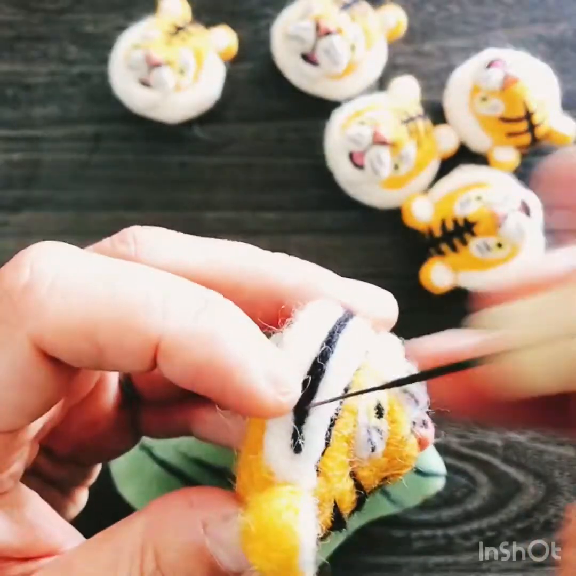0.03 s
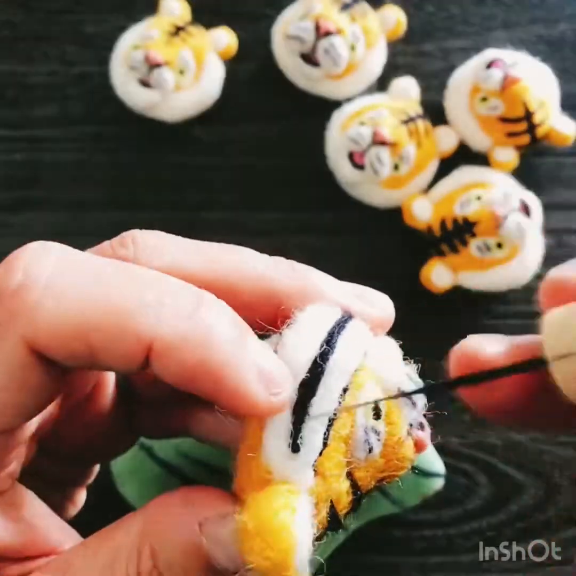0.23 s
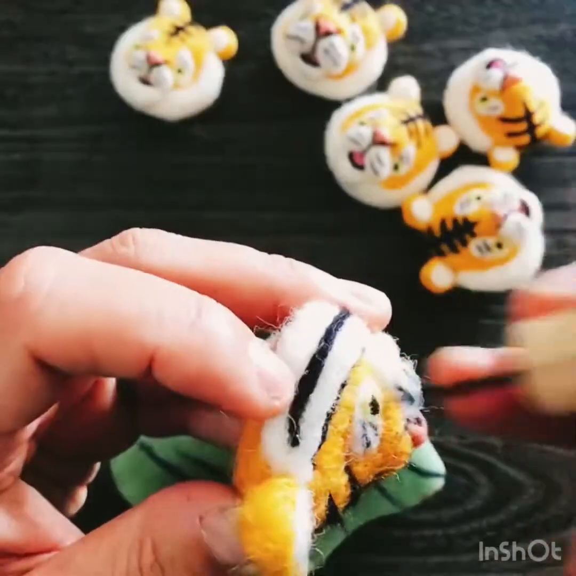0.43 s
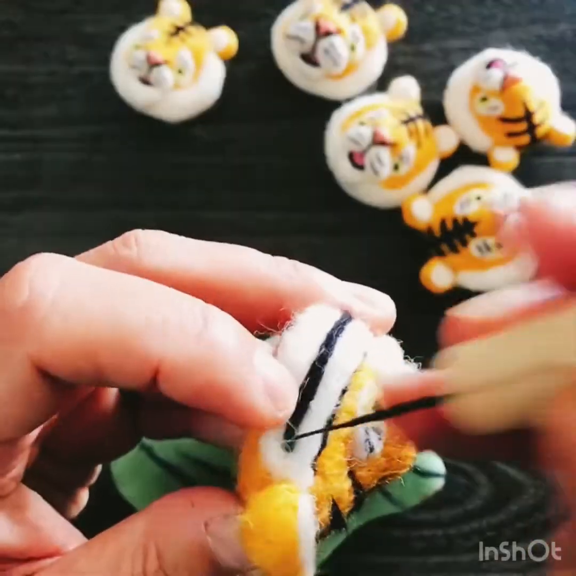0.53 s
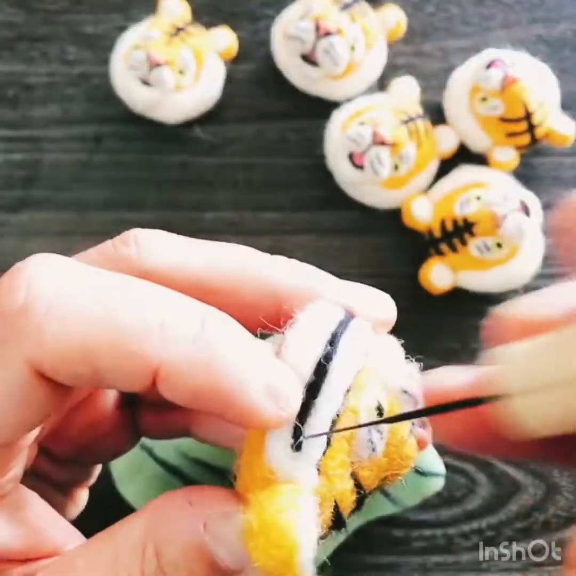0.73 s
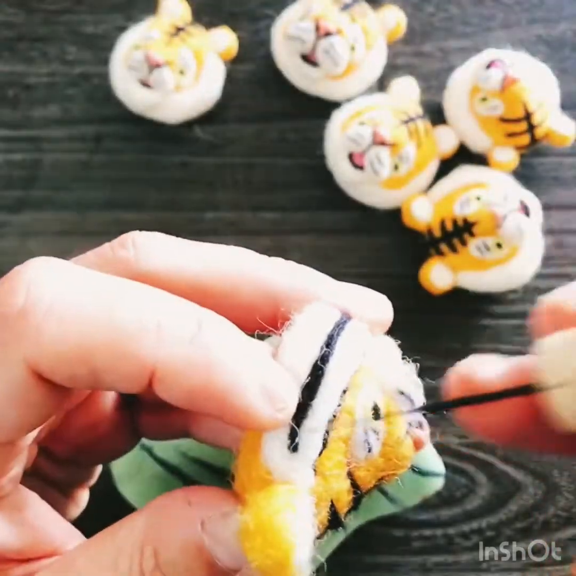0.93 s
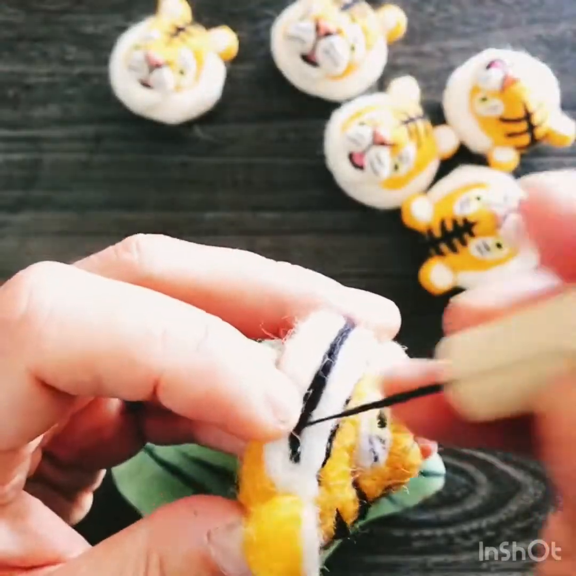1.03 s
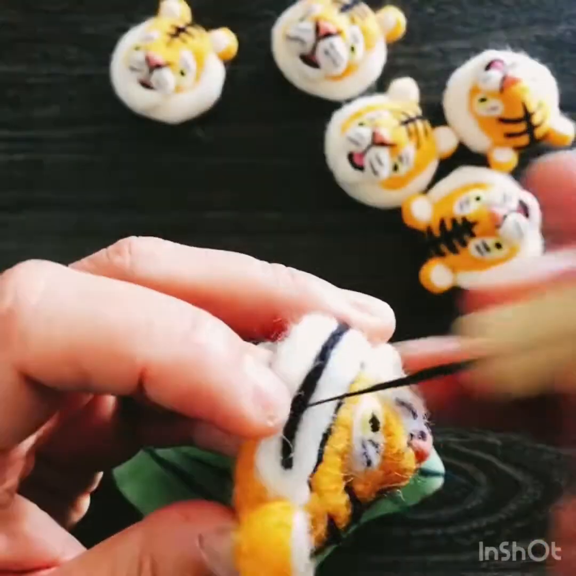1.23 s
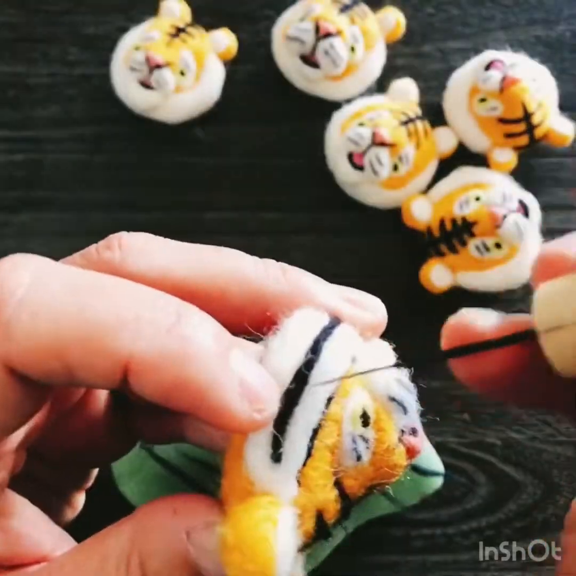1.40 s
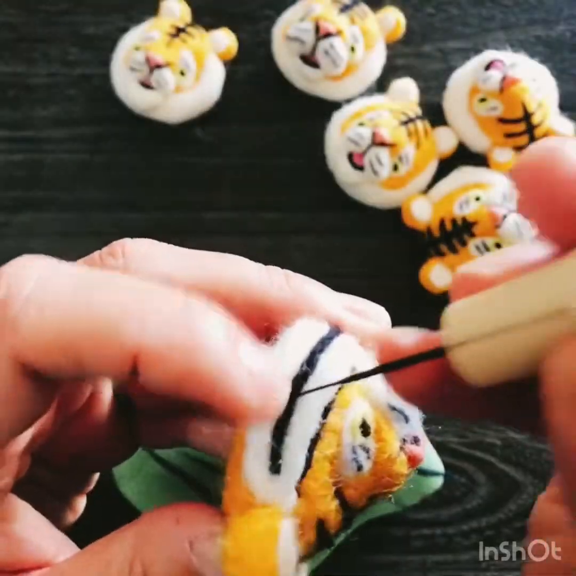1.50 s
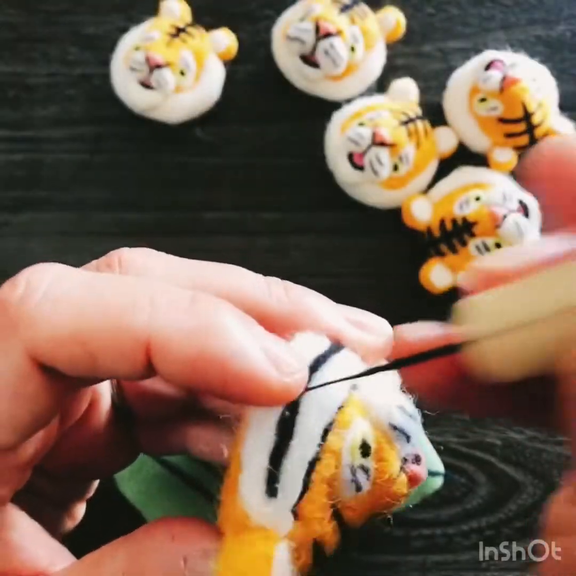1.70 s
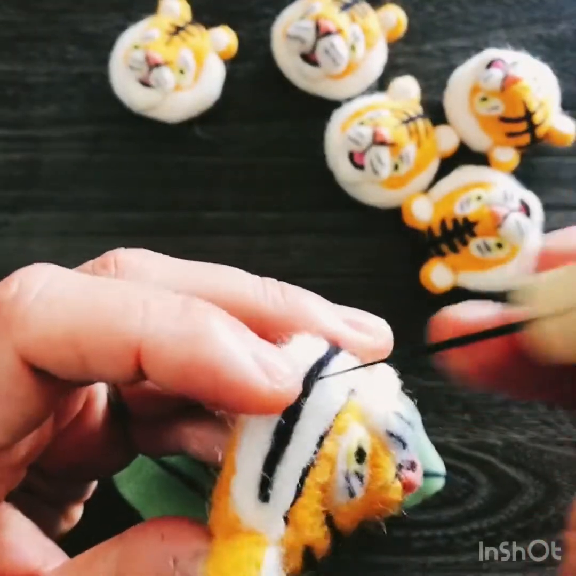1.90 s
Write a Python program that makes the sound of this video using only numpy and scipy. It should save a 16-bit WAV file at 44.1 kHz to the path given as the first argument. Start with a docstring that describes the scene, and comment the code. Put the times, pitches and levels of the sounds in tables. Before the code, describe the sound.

A felting needle stabs wool eight times, making soft, short, scratchy crunches.

```python
"""A barbed felting needle is pushed eight times into a small hand-held wool figure, in a quiet room.
Each stab drags thousands of fibres over the barbs. Their stick-slip friction is a random train of
impulses, heard as a dense crunch with narrow resonances and a finer fizz. One fibre snaps, the packed
wool yields in dull puffs, and fingers rub and tick on the figure. Reflections from the hands, table
and room follow briefly, over a low hum, rumble and hiss."""
import sys
import numpy as np
from scipy import signal
from scipy.io import wavfile

SR = 44100
rng = np.random.default_rng(int(sys.argv[2]) if len(sys.argv) > 2 else 0)


def to_wav(sig):
    """Store sig (one row per channel, or 1-D mono) as 16-bit WAV at the path in sys.argv[1].

    Samples outside -1..1 are clipped; the rate is SR.
    """
    pcm = np.clip(np.atleast_2d(sig), -1, 1) * 32767
    pcm = np.round(pcm).astype(np.int16)
    wavfile.write(sys.argv[1], SR, pcm.T)  # frames by channels


N = 85995

# Spectral envelopes of the crunch and the fizz: f/Hz, relative level/dB
CRUNCH_SPECTRUM = [(150, -31), (650, -31), (1100, -20), (1450, -12.5), (1800, -6.5), (3000, -2),
                   (3600, -0.5), (5000, 0), (6100, -2), (7000, -10.5), (8200, -19.5), (11000, -29.5),
                   (16000, -39)]
FIZZ_SPECTRUM = [(1000, -31), (4000, -6), (8000, 2), (9900, -1), (10500, -9.5), (11200, -1.5), (12400, -7),
                 (14200, -2), (15700, -5.5)]
# Their resonances, before the limits set in colour(): f/Hz, bandwidth/Hz, lift/dB
CRUNCH_RESONANCES = [(1705, 104, 5.5), (2016, 36, 4.5), (2219, 61, 4.5), (2560, 86, 0.5), (3520, 190, 5),
                     (3850, 33, -1.5), (4215, 120, 5), (4560, 39, 6.5), (4777, 30, -2.5), (5380, 31, 3),
                     (5550, 93, 5), (5770, 35, 3), (6170, 98, 5.5), (6700, 41, 5.5)]
LOW_RESONANCE = (935, 65, 5.5)
FIZZ_RESONANCES = [(7000, 32, 8.5), (9700, 130, 10), (10050, 180, 7.5)]
# Needle strokes: onset t/s, rise t/s, push t/s, level/dB, decay constant t/s, fizz offset/dB,
# emphasis f/Hz, emphasis lift/dB, squeak f/Hz, low-edge lift/dB
STABS = [(0.22, 0.063, 0.1, -42.5, 0.011, 2.5, 1750, -0.5, 3610, 5),
         (0.409, 0.066, 0.065, -40.5, 0.015, 0.5, 6800, 4, 5220, 0),
         (0.553, 0.047, 0.065, -41, 0.019, 2, 5350, 2.5, 4300, 3),
         (0.704, 0.054, 0.071, -43, 0.02, 1, 2820, 3.5, 4200, 5),
         (0.845, 0.048, 0.089, -42, 0.0084, -2, 4930, 2.5, 4080, 2.5),
         (1.034, 0.034, 0.072, -39.5, 0.012, 0.5, 6370, 7, 4740, -1),
         (1.218, 0.04, 0.089, -43, 0.016, -2.5, 5340, 0.5, 4900, -2.5),
         (1.402, 0.044, 0.14, -41.5, 0.021, -1.5, 3750, 2, 5450, 0.7)]
SLIPS_PER_S, SLIP_SPREAD_DB = 9000, 3
FIZZ_LAG_S, FIZZ_DB = 0.0075, -15

def stab(start, rise, length, db, decay, fizz_db, emphasis_hz, emphasis_db, squeak_hz, edge_db):
    """Stick-slip friction: barbs catch and release fibres, and each spot of wool has its own peaks."""
    push = stroke(start, rise, length, decay)
    late_push = stroke(start + FIZZ_LAG_S, rise, length - FIZZ_LAG_S, decay=0.023)
    # f/Hz, bandwidth/Hz, lift/dB
    local_peaks = [(emphasis_hz, 790, emphasis_db), (squeak_hz, 300, 4.5), (820, 1050, edge_db)]
    resonances = [LOW_RESONANCE] + CRUNCH_RESONANCES + local_peaks
    crunch = colour(push * slips(SLIPS_PER_S, SLIP_SPREAD_DB), CRUNCH_SPECTRUM, resonances)
    fizz = colour(late_push * slips(per_s=6000, spread_db=1.5), FIZZ_SPECTRUM, FIZZ_RESONANCES)
    return amp(db) * (crunch + amp(FIZZ_DB + fizz_db) * fizz)


def stroke(start, rise, length, decay, sag_db=-3):
    """Friction noise follows sliding speed, which builds, sags under resistance and dies away."""
    t = np.maximum(np.arange(N) / SR - start, 0)
    build = np.sin(np.pi / 2 * np.minimum(t / rise, 1)) ** 1.1
    sag = amp(sag_db * np.minimum(t / length, 1))
    return build * sag * np.exp(-np.maximum(t - length, 0) / decay)


def slips(per_s, spread_db):
    """Shot noise: fibres slip at independent random moments, in many small clicks and a few large."""
    size = amp(spread_db * np.minimum(rng.exponential(1, N), 4))
    polarity = rng.choice([-1, 1], N)
    slipping = rng.random(N) < per_s / SR
    return unit_rms(size * polarity * slipping)


def colour(x, spectrum, resonances=(), min_width_hz=45, max_lift_db=7, size=8192):
    """Source-filter principle: a unit-energy, minimum-phase filter sets a broad spectrum with peaks."""
    hz = abs(np.fft.fftfreq(size, 1 / SR))
    peaks_db = sum(min(lift, max_lift_db) / (1 + (2 * (hz - f) / max(width, min_width_hz)) ** 2)
                   for f, width, lift in resonances)
    log_gain = np.log(amp(curve_at(spectrum, hz) + peaks_db))
    transfer = np.exp(np.conj(signal.hilbert(log_gain)))
    return convolve(x, np.fft.ifft(transfer).real[:size // 2])


def fibre_break(start=1.2515, db=-35):
    """Impulse excitation: one fibre breaks in the seventh stab with a single bright click."""
    impulse = np.zeros(N)
    impulse[round(start * SR)] = 1
    return amp(db) * colour(impulse, FIZZ_SPECTRUM)


# Moments when the wool gives way: onset t/s, level/dB
PUFFS = [(0.281, -67.5), (0.516, -76), (0.754, -71), (1.228, -73)]
# Spectral envelope of a puff: f/Hz, relative level/dB
PUFF_SPECTRUM = [(150, -13), (400, -5), (600, 1), (850, -4), (2000, -19)]

def wool_puffs():
    """Yielding under load: packed wool gives way to the needle with a soft, low burst of noise."""
    push = sum(amp(db) * stroke(start, rise=0.019, length=0.027, decay=0.011) for start, db in PUFFS)
    return colour(push * slips(per_s=1700, spread_db=1), PUFF_SPECTRUM)


# Finger movements: onset t/s, rise t/s, push t/s, level/dB
RUBS = [(0.011, 0.071, 0.06, -59.5), (0.124, 0.015, 0.056, -80.5), (0.514, 0.0044, 0.036, -62),
        (0.993, 0.041, 0.048, -60.5), (1.209, 0.024, 0.044, -60), (1.363, 0.033, 0.03, -69),
        (1.58, 0.0051, 0.047, -72), (1.653, 0.037, 0.037, -68.5), (1.899, 0.028, 0.045, -74.5)]
# Spectral envelope of the rubbing: f/Hz, relative level/dB
RUB_SPECTRUM = [(150, -0.5), (600, -9.5), (1300, -13.5), (2000, 3), (2700, -5.5), (3450, -5.5),
                (4500, -7.5), (6300, -6), (8500, -10), (12000, -11.5), (15700, -17)]
# Its resonances, before the limits set in colour(): f/Hz, bandwidth/Hz, lift/dB
RUB_RESONANCES = [(2040, 93, -1), (3430, 300, 9.5)]
GRIP_DB = -85

def finger_rubs():
    """Sliding friction: fingers shift on the wool, above the faint steady rustle of their grip."""
    moves = sum(amp(db) * stroke(start, rise, length, decay=0.015) for start, rise, length, db in RUBS)
    friction = (amp(GRIP_DB) + moves) * slips(per_s=4000, spread_db=4.5)
    return colour(friction, RUB_SPECTRUM, RUB_RESONANCES)


# Small ticks of needle and fibres: onset t/s, crackle level/dB, ring level/dB
TICKS = [(0.135, -87.5, -67), (0.2, -74.5, -76), (0.548, -67, -70), (1.679, -67, -68), (1.702, -58, -56.5),
         (1.717, -74, -72), (1.79, -83, -71), (1.821, -67.5, -71), (1.872, -91, -75), (1.912, -77, -73),
         (1.933, -72, -81)]
# Spectral envelope of the crackle: f/Hz, relative level/dB
CRACKLE_SPECTRUM = [(150, -6), (900, -4), (1500, -11), (2000, -1), (2700, -10.5), (3450, -1), (7000, -6.5),
                    (12000, -6), (15700, -13)]

def ticks():
    """Transient excitation: each tick is a brief burst of slips together with a woody ring."""
    bursts = sum(amp(db) * stroke(start, rise=0.0026, length=0.0074, decay=0.0022)
                 for start, db, _ in TICKS)
    crackle = colour(bursts * slips(SLIPS_PER_S, SLIP_SPREAD_DB), CRACKLE_SPECTRUM)
    return crackle + sum(amp(db) * woody_ring(start) for start, _, db in TICKS)


# Modes of a tick: f/Hz, relative level/dB, 60 dB decay t/s
TICK_MODES = [(1948, -1.5, 0.023), (2184, 1, 0.016), (3410, -4.5, 0.022)]

def woody_ring(start, rise=0.0042, detune=0.022):
    """Damped vibration: modes swell and decay exponentially, tuned a little differently each tick."""
    t = np.maximum(np.arange(N) / SR - start, 0)
    swell = np.minimum(t / rise, 1) ** 2
    since_peak = np.maximum(t - rise, 0)
    modes = np.zeros(N)
    for hz, db, t60 in TICK_MODES:
        tuned_hz = hz * (1 + detune * rng.uniform(-0.92, 1))
        modes += amp(db - 60 * since_peak / t60) * np.sin(2 * np.pi * (tuned_hz * t + rng.random()))
    return swell * modes


def hand_scatter(x, db=-8.5, t60=0.032, cutoff_hz=1400):
    """Interference: treble scattered off the moving hands ripples each stab's spectrum differently."""
    t = np.arange(SR // 20) / SR
    scatter = rng.standard_normal(len(t)) * amp(-60 * t / t60)
    scatter = signal.sosfilt(signal.butter(2, cutoff_hz, "high", fs=SR, output="sos"), scatter)
    response = amp(db) * scatter / np.linalg.norm(scatter)
    response[0] += 1  # direct sound
    return convolve(x, response)


# Early reflections from the table and near surfaces: delay t/s, pressure ratio to the direct sound
REFLECTIONS = [(.00181, 0.0093), (.00328, 0.054), (.00747, 0.23), (.0088, -0.14)]
# Reverberation time: f/Hz, 60 dB decay t/s
ROOM_T60 = [(500, 0.32), (2000, 0.26), (5000, 0.22), (12000, 0.15)]

def room(x, wet_db, gap_s=0.0041):
    """Reverberation: early reflections and a random diffuse tail whose treble is absorbed first."""
    hz, t, noise = signal.stft(rng.standard_normal(SR // 2), SR, nperseg=256)
    decay = amp(-60 * t / curve_at(ROOM_T60, hz)[:, None])
    _, tail = signal.istft(noise * decay, SR)
    tail *= np.arange(len(tail)) > gap_s * SR
    response = amp(wet_db) * tail / np.linalg.norm(tail)
    response[0] += 1  # direct sound
    for delay, gain in REFLECTIONS:
        response[round(delay * SR)] += gain
    return convolve(x, response)


# Spectral envelope of the room's rumble and hiss: f/Hz, relative level/dB
AMBIENT_SPECTRUM = [(10, -2), (25, 3.5), (45, -13), (85, -14), (150, -21.5), (300, -21.5), (600, -31.5),
                    (1500, -37), (5000, -41.5), (13000, -44), (15700, -51.5)]
# Tones of the hum: f/Hz, rms level/dB
HUM_TONES = [(66.6, -68.5), (110, -84)]
AMBIENT_DB = -66.5
BUMP_AT_S, BUMP_WIDTH_S, BUMP_HZ, BUMP_DB = 0.361, 0.026, 37.4, -45

def background():
    """Ambient noise: broadband rumble and hiss, a tonal hum and one soft, low Gaussian tone pulse."""
    t = np.arange(N) / SR
    hum = sum(amp(db) * unit_rms(np.sin(2 * np.pi * (hz * t + rng.random()))) for hz, db in HUM_TONES)
    from_bump = t - BUMP_AT_S
    bump = amp(BUMP_DB) * np.exp(-(from_bump / BUMP_WIDTH_S) ** 2) * np.sin(2 * np.pi * BUMP_HZ * from_bump)
    return amp(AMBIENT_DB) * colour(rng.standard_normal(N), AMBIENT_SPECTRUM) + hum + bump


def amp(db):
    """Amplitude ratio of a level in decibels."""
    return 10 ** (np.asarray(db) / 20)


def unit_rms(x):
    """Normalisation to a root mean square of 1."""
    return x / np.sqrt(np.mean(x ** 2) + 1e-20)


def curve_at(points, hz):
    """Interpolation on a logarithmic frequency axis."""
    f, value = np.transpose(points)
    return np.interp(np.log(hz + 1), np.log(f), value)


def convolve(x, response):
    """Linear filtering by an impulse response scaled to unit energy."""
    return signal.fftconvolve(x, response / np.linalg.norm(response))[:N]


def scene():
    """Superposition: the stabs, each with its own diffuse tail, add to the handling and background."""
    needle = sum(room(hand_scatter(stab(*row)), wet_db=-4) for row in STABS) + fibre_break()
    handling = room(finger_rubs() + ticks() + wool_puffs(), wet_db=-22)
    return (needle + handling + background())[None]


def record(dry, cutoff_hz=15760):
    """Band limiting: a linear-phase low-pass filter removes the highest treble."""
    lowpass = signal.firwin(1023, cutoff_hz, window=("kaiser", 9), fs=SR)
    return signal.oaconvolve(dry, lowpass[None], "same")


dry = scene()
out = record(dry)
to_wav(out)
```